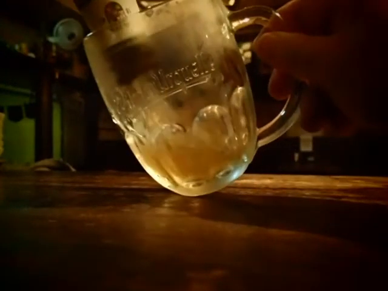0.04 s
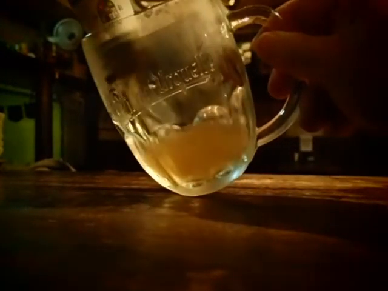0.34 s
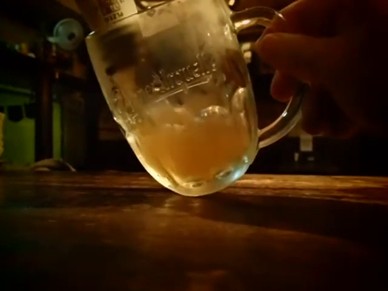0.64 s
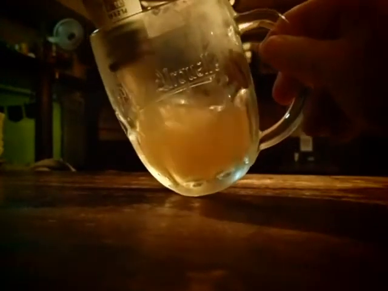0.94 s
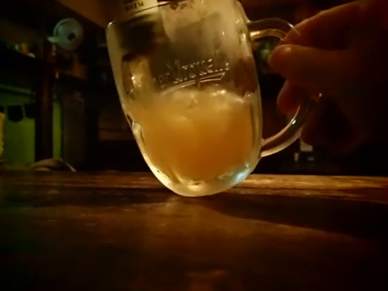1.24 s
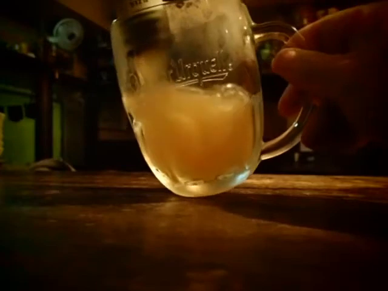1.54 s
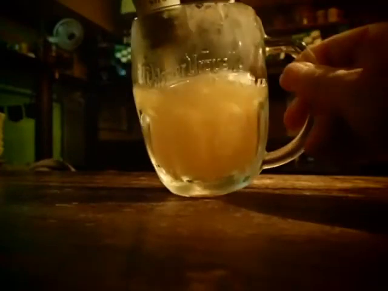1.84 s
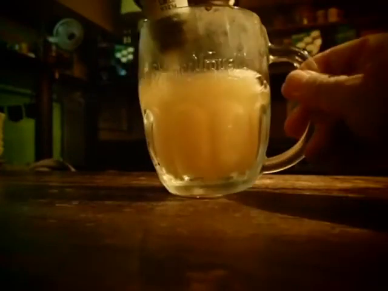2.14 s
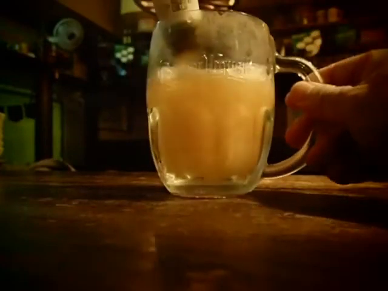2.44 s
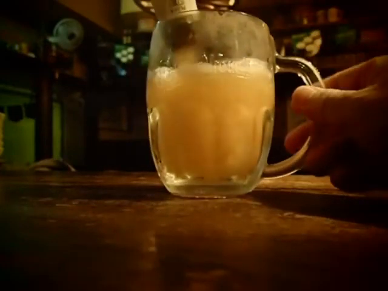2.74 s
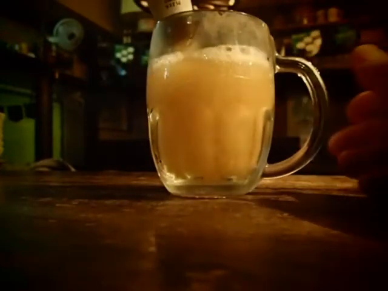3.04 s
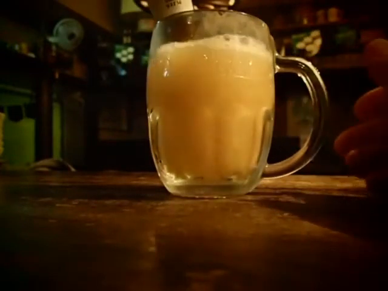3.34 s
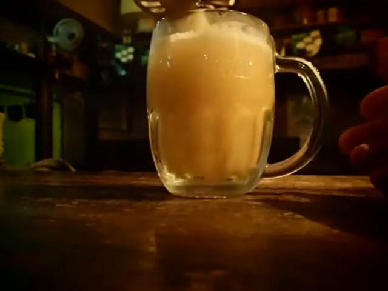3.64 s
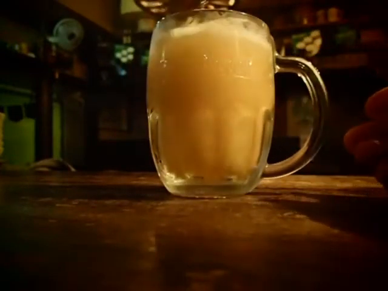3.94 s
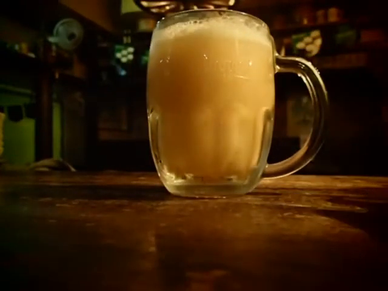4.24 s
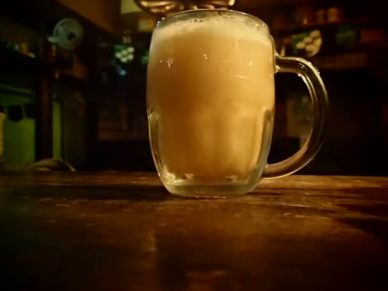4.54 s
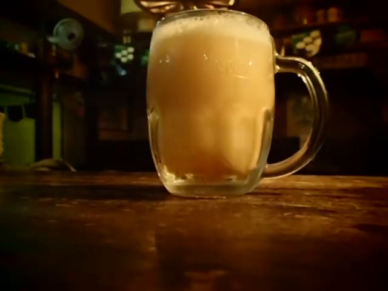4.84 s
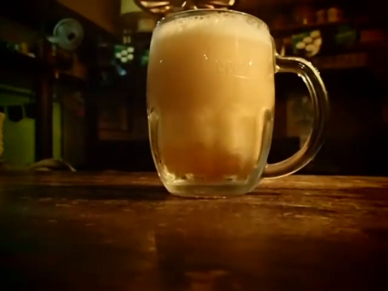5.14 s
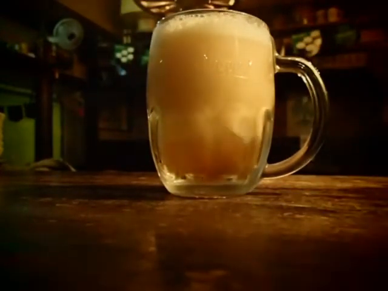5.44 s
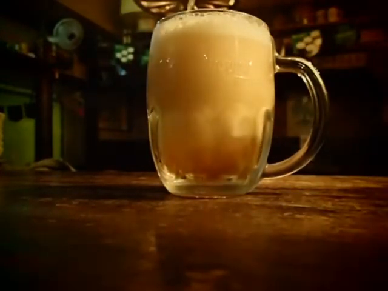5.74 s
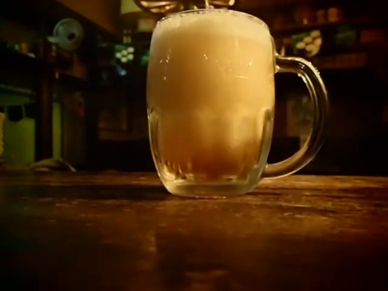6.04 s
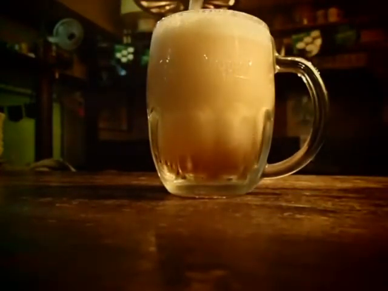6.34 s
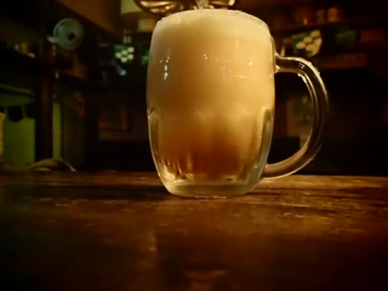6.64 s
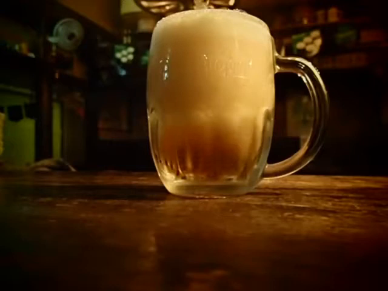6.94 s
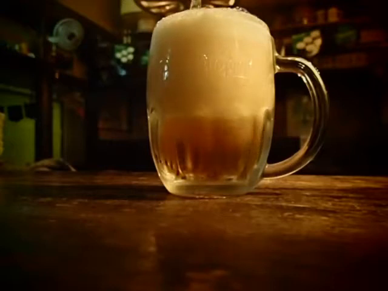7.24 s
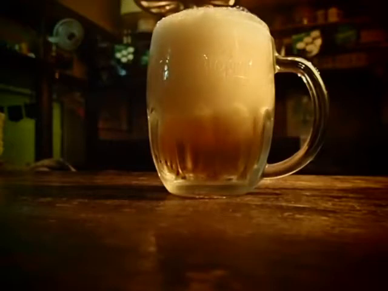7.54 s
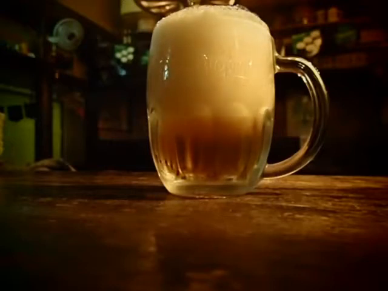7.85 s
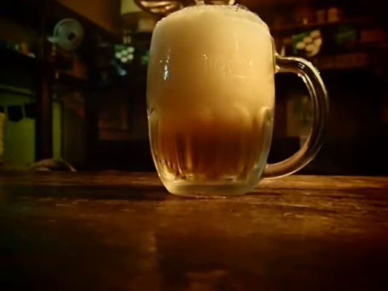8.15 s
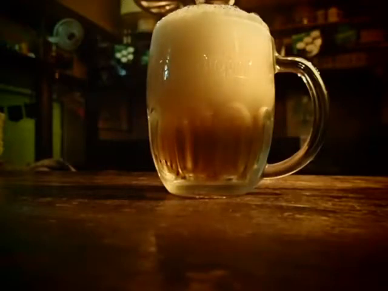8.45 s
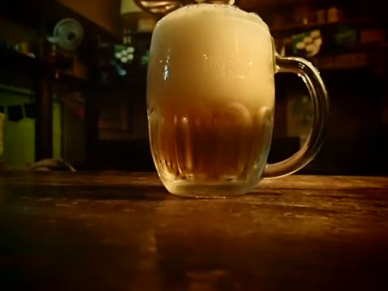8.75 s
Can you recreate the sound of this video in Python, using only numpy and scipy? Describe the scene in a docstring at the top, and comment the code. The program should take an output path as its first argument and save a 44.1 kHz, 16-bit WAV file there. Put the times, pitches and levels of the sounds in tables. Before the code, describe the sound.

Close, bubbly pouring into a glass mug tapers off, followed by a few sharp clinks and faint fizzing, with a cooler humming behind.

```python
"""A wooden bar in a quiet room, where beer is poured from a bottle into a tilted glass mug, heard up close.
Air gulps into the bottle and kicks the neck's resonances; the stream drags bubbles under, where they
ring, and others burst at the surface. The neck clinks on the rim, the mug bumps the wood, foam spurts
once and fresh foam fizzes in swells over a faint high hiss. A cooler hums throughout. A small
microphone colours it all, and its gain control ducks the loudest peaks."""
import sys
import numpy as np
from scipy import signal
from scipy.fft import rfft, irfft, next_fast_len
from scipy.io import wavfile

SR = 44100
rng = np.random.default_rng(int(sys.argv[2]) if len(sys.argv) > 2 else 0)


def wav_record(signal):
    """Record a signal, one row per channel, as 16-bit PCM in the file named by sys.argv[1]."""
    frames = np.transpose(np.atleast_2d(signal))
    bounded = np.clip(frames, -1, 1)
    # unit amplitude maps onto the largest positive 16-bit level
    quanta = np.round(bounded * 32767).astype(np.int16)
    wavfile.write(sys.argv[1], SR, quanta)


N = 392931

# The bottle neck's damped modes. Each row: pitch in Hz, level in dB, time to fall 60 dB in seconds.
NECK_MODES = [(221, -4, 0.028), (433, 3, 0.0098), (800, 3.5, 0.0091), (976, -4.5, 0.042),
              (1570, -11, 0.0033)]
# The half-empty mug singing. Each row: pitch in Hz, level in dB, time to fall 60 dB in seconds.
SINGING_MODES = [(5440, -39, 0.45), (5360, -39, 0.52), (5670, -34.5, 0.32), (5920, -35, 0.23),
                 (7500, -41, .07)]
# Air gulps. Each row: start in seconds, then relative levels in dB of slap, bubble, burst and spray.
AIR_GULPS = [(.461, -20, -31, -15, -35), (.552, -21.5, -38, -13, -29), (0.836, -21.5, -41, -26, -34.5),
             (0.846, -21, -37, -19, -33), (1.142, -13, -19, -18.5, -33.5), (1.158, -8, -27, -.5, -19.5),
             (1.385, -26, -26.5, -33, -47), (1.463, -14, -23.5, -26.5, -37.5),
             (1.777, -19.5, -22.5, -14.5, -37), (1.952, -26, -26.5, -14.5, -30.5),
             (2.302, -17.5, -25, -29.5, -48)]
def gulps(slap_db, singing_db):
    """Each gulp slaps the neck, sinks a bubble and throws a burst; the hardest sets the mug singing."""
    out = np.zeros((2, N))
    burst_lag_s, hardest_gulp_s = .001288, 1.160
    for s, db, bubble_db, burst_db, spray_db in AIR_GULPS:
        add(out, s, from_db(db + slap_db) * struck(NECK_MODES, scatter_db=1))
        add(out, s, from_db(bubble_db) * glug(hz=1014, length_s=.01))  # the neck makes them all one size
        add(out, s + burst_lag_s, burst(burst_db, spray_db, spread_octaves=.013))
    add(out, hardest_gulp_s, from_db(singing_db) * struck(SINGING_MODES, scatter_db=1))
    return out


# Big bubbles. Each row: start in seconds, relative level in dB, starting pitch in Hz, length in seconds.
LARGE_BUBBLES = [(.004, -22, 990, 0.021), (.005, -25, 2070, .012), (0.069, -27, 595, 0.021),
                 (0.069, -40, 2760, 0.013), (.717, -22, 913, 0.011), (.765, -18, 660, .011),
                 (0.78, -15, 566, 0.013), (0.946, -26, 670, .021), (.956, -19.5, 850, 0.019),
                 (1.1, -29, 800, .026), (1.201, -20, 750, 0.031), (1.2394, -17.5, 866, 0.014),
                 (1.585, -26, 1194, .011), (1.664, -37, 2810, .009), (1.801, -27.5, 825, .013),
                 (2.734, -37.5, 2130, .013), (4.72, -39, 2000, 0.018)]
def glugs(level_db):
    """The stream drags large bubbles under, and they ring below the surface."""
    out = np.zeros(N)
    for s, db, hz, length_s in LARGE_BUBBLES:
        add(out, s, from_db(db + level_db) * glug(hz, length_s))
    return out


def glug(hz, length_s, rise_octaves_per_s=19.2, attack_share=.13, wobble=.081, rough=.51):
    """A large bubble swells and dies, shaken by the stream; its pitch climbs as it nears the surface."""
    age = np.linspace(0, 1, int(length_s * SR))
    bend, shake = (np.interp(age, np.linspace(0, 1, 10), knots) for knots in rng.standard_normal((2, 10)))
    pitch = hz * 2 ** (rise_octaves_per_s * length_s * age) * (1 + wobble * bend)
    swell = np.minimum(age / attack_share, 1) * np.cos(np.pi / 2 * age) * (1 + rough * shake)
    return swell * np.sin(2 * np.pi * np.cumsum(pitch) / SR)


# The foreground pops. Each row: start in seconds, then relative levels in dB of burst and spray.
SURFACE_POPS = [(.0034, -11, -40), (.0747, -30, -40), (.1008, -34, -37), (.1345, -14.5, -40),
                (0.4751, -11.5, -48), (0.8556, -15.5, -37), (.8809, -22, -35), (0.8952, -16, -41),
                (0.9022, -9, -33), (1.135, -24, -35), (1.233, -15.5, -32), (1.243, -15, -39),
                (1.536, -23, -39), (1.5442, -16.5, -39), (1.865, -18.5, -41), (1.901, -24, -45),
                (1.974, -28, -44), (2.059, -32, -43), (2.2172, -30.5, -47), (2.533, -26, -55),
                (2.815, -25, -33.5), (3.7788, -25, -41), (3.8364, -29, -38), (4.0482, -11.5, -31),
                (4.296, -26, -43), (4.847, -11.5, -51), (5.464, -30, -46)]
def pops():
    """Clusters of small bubbles burst at the surface."""
    out = np.zeros((2, N))
    for s, db, spray_db in SURFACE_POPS:
        add(out, s, burst(db, spray_db, spread_octaves=.052))
    return out


def burst(db, spray_db, spread_octaves, ring_db=-9.0, snap_db=-1.0, snap_s=.0045, width=.35):
    """A bubble's film tears with a snap, the opened cavities ring and finer spray follows; stereo."""
    detune = 2 ** (spread_octaves * rng.standard_normal())
    ring = cluster(hz=5396 * detune, octaves=.17, cycles=4.95, scatter_s=.0045, count=3)
    spray = cluster(hz=7980 * detune, octaves=.51, cycles=6.8, scatter_s=.007, count=7)
    splash = cluster(hz=3300, octaves=.93, cycles=3.1, scatter_s=.012, count=5)
    t = np.arange(len(ring)) / SR
    snap, side = from_db(spray_db + snap_db) * rng.standard_normal((2, len(t))) * np.exp(-t / snap_s)
    mid = snap + from_db(db + ring_db) * ring + from_db(spray_db) * (spray + .67 * splash)
    return lowpass(mid + width * side * [[1], [-1]], hz=12000, order=1)


def cluster(hz, octaves, cycles, scatter_s, count):
    """Bubbles of mixed sizes go off one after another; peak 1."""
    out = np.zeros(SR // 25)
    for k, (size, late, strength) in enumerate(rng.random((count, 3))):
        start = min(int((k + late) / count * scatter_s * SR), len(out) - 1) if k else 0
        ring = bubble(hz * 2 ** (octaves * (size - .5)), cycles, rise=.015)
        out[start:] += (.5 + strength) * (1 - .5 * k / count) * ring[:len(out) - start]
    return out / np.abs(out).max()


def bubble(hz, cycles, rise):
    """A small bubble chirps upward, fading to 1/e in about the given number of cycles."""
    turns = hz * np.arange(SR // 25) / SR
    return np.sin(2 * np.pi * turns * (1 + rise * turns / cycles)) * np.exp(-turns / cycles)


# The stream plunging into the mug. Each row: time in seconds, bubbles per second (none below zero).
STREAM_RATE = [(0, 130), (.5, 90), (1.2, 180), (2.0, 170), (2.5, 81), (3.2, 15), (3.5, -2)]
def trickle(level_db, size_db, tilt_db_per_octave, cycles):
    """The stream drags in faint, short-lived bubbles; the smaller, the higher and weaker."""
    out = np.zeros(N)
    starts = random_times(STREAM_RATE)
    for s, (smallness, strength) in zip(starts, rng.random((len(starts), 2))):
        octave = 3.8 * np.sqrt(smallness)
        db = level_db + tilt_db_per_octave * octave + size_db * strength ** 2
        add(out, s, from_db(db) * bubble(650 * 2 ** octave, cycles, rise=.018))
    return out


def stray_pops(burst_db, spray_db, scatter_db):
    """A few bubbles burst faintly, at random, while the stream runs."""
    out = np.zeros((2, N))
    for s in random_times(STREAM_RATE, share=.09):
        size_db = scatter_db * min(rng.standard_normal(), 2)
        add(out, s, burst(burst_db + size_db, spray_db + size_db, spread_octaves=.15))
    return out


# The full mug, damped by its beer. Each row: pitch in Hz, level in dB, time to fall 60 dB in seconds.
MUG_MODES = [(1005, -18, 0.055), (2200, -31, 0.067), (2780, -14.5, 0.018), (3100, -16, 0.015),
             (2940, -55, 0.75), (3620, -23.5, 0.02), (4700, -22, 0.014), (5120, -17.5, 0.034),
             (5310, -26, 0.054), (5680, -23.5, 0.025), (6170, -13.5, 0.003), (7370, -18.5, 0.042),
             (8860, -41, 0.064), (9900, -34, 0.027), (13100, -40, .03), (12800, -34, .03)]
# The wooden bar top. Each row: pitch in Hz, level in dB, time to fall 60 dB in seconds.
BAR_MODES = [(169, -15, 0.15), (249, -7, 0.095), (302, -9, 0.1), (490, -7.5, 0.053), (660, -11, 0.031),
             (974, -5.5, 0.021), (1264, -4.5, 0.015), (1583, -9, 0.04), (2250, 3.5, 0.0032)]
# Bottle on rim. Each row: start in seconds, relative glass level in dB, low-pass cutoff in Hz,
# relative thud level in dB, rebound in dB against the first blow.
RIM_HITS = [(3.378, 2.5, 12900, -25, -10), (3.4586, 1.5, 12900, -21, -28), (3.5132, -4.5, 13200, -14, -7),
            (3.7273, 0, 6050, -13.5, -6)]
def clinks(glass_db, thud_db, crack_db, rebound_s=.0128, crack_t60_s=.012):
    """The neck hits the rim with a crack and a ring, thuds through to the wood and falls back once."""
    out = np.zeros(N)
    for s, db, contact_hz, wood_db, rebound_db in RIM_HITS:
        for at, loss_db in ((s, 0), (s + rebound_s, rebound_db)):
            ring = struck(MUG_MODES, scatter_db=.5)
            wood = struck(BAR_MODES, scatter_db=1)
            t = np.arange(len(ring)) / SR
            crack = from_db(crack_db - 60 * t / crack_t60_s) * rng.standard_normal(len(t))
            glass = lowpass(ring + lowpass(crack, hz=7700), contact_hz, order=8)
            add(out, at, from_db(db + loss_db + glass_db) * glass)
            add(out, at, from_db(wood_db + loss_db + thud_db) * wood)
    return out


# The bottle's glass. Each row: pitch in Hz, level in dB, time to fall 60 dB in seconds.
BOTTLE_MODES = [(3110, -31, 0.084), (3220, -36, 0.15), (4400, -36, 0.013), (5260, -39.5, 0.11),
                (5580, -36.5, 0.12), (5800, -47, .2)]
def bottle_tap(start_s):
    """A last light tap sets the bottle itself ringing."""
    out = np.zeros(N)
    add(out, start_s, struck(BOTTLE_MODES, scatter_db=.5))
    return out


# The mug's heel rocking as it is set upright. Each row: start in seconds, relative level in dB.
HEEL_BUMPS = [(1.465, -25), (1.498, -17), (2.304, -13), (2.315, -25)]
def knocks(level_db):
    """The heavy base bumps softly on the wood, so only the bar's low modes answer."""
    out = np.zeros(N)
    for s, db in HEEL_BUMPS:
        add(out, s, from_db(db + level_db) * lowpass(struck(BAR_MODES, scatter_db=4), hz=260))
    return out


# The spurt's bright hiss. Each row: frequency in Hz, relative level in dB.
SPURT_EQ = [(1200, 4.5), (2500, 4), (4000, 1), (5200, 15.5), (6200, -5), (7200, 13.5), (8000, 14.5),
            (10000, -12), (12000, 3), (15000, -20)]
def spurt(start_s, crest_db, attack_s=.018, rise_db_per_s=330, fall_db_per_s=290):
    """A plug of foam breaks out of the neck all at once, grows briefly and dies away."""
    age = np.arange(N) / SR - start_s
    past_crest = age - attack_s
    db = crest_db + np.minimum(rise_db_per_s * past_crest, -fall_db_per_s * past_crest)
    return (age > 0) * from_db(db) * stereo_bed(crackle(per_s=8600, size_db=1.5), SPURT_EQ)


# The tone of the steady high hiss. Each row: frequency in Hz, relative level in dB.
HISS_EQ = [(1000, -9), (2300, 2), (4000, -2.5), (5400, 3.5), (6200, 4.5), (7000, -3), (8200, -1.5),
           (10000, -4.5), (15000, -8)]
# The tone of fresh foam. Each row: frequency in Hz, relative level in dB.
FRESH_FOAM_EQ = [(1000, -8), (2300, 1.5), (4000, -3), (5300, 5.5), (6200, 2.5), (7000, 0.5), (8400, 1),
                 (10000, -6), (15000, -8.5)]
# Fresh foam running onto the head. Each row: crest time in seconds, level in dB, half width in seconds.
FOAM_SWELLS = [(2.96, -47.5, 0.21), (3.85, -52, 0.074), (4.48, -48.5, 0.45), (5.47, -44, .025),
               (5.49, -44.5, .135)]
def foam_and_hiss(hiss_db, flutter_db, roundness):
    """Fresh foam fizzes in swells over a steady, faint high hiss, microphone noise or fine fizz."""
    t = np.arange(N) / SR
    hiss = from_db(hiss_db) * stereo_bed(crackle(per_s=14000, size_db=2.5), HISS_EQ)
    swell = sum(from_db(db) * np.exp(-np.abs((t - s) / width) ** roundness)
                for s, db, width in FOAM_SWELLS)
    fresh = stereo_bed(crackle(per_s=7000, size_db=1.0), FRESH_FOAM_EQ)
    return from_db(flutter_db * drift(per_s=31)) * (hiss + swell * fresh)


def crackle(per_s, size_db):
    """Two streams of tiny random clicks of uneven size."""
    born = rng.random((2, N)) < per_s / SR
    clicks = born * rng.standard_normal((2, N))
    return clicks * from_db(size_db * np.minimum(rng.exponential(1, (2, N)), 4))


# Room air and the cooler's fan. Each row: frequency in Hz, relative level in dB.
FAN_EQ = [(20, -22), (45, -11.5), (110, -7), (150, -4.5), (230, 0), (330, -6), (550, -12), (900, -13.5),
          (1050, -17.5), (1300, -18), (1700, -25.5), (2600, -32.5), (5000, -48), (15000, -44)]
# The cooler's motor tones. Each row: pitch in Hz, relative level in dB.
MOTOR_TONES = [(96, -45), (190, -43), (232, -43), (241, -40), (296, -41), (346, -51.5), (490, -52.5),
               (647, -48), (705, -48.5), (752, -50), (799, -57.5), (934, -49), (966, -52.5)]
def cooler(air_db, hum_db, waver_db, wander_rad):
    """The fan rushes softly under motor tones that waver in level and phase."""
    t = np.arange(N) / SR
    hum = np.zeros(N)
    for hz, db in MOTOR_TONES:
        amplitude = np.sqrt(2) * from_db(db + waver_db * drift(per_s=16))
        hum += amplitude * np.sin(2 * np.pi * hz * t + wander_rad * drift(per_s=15))
    air = stereo_bed(rng.standard_normal((2, N)), FAN_EQ)
    return from_db(air_db) * air + from_db(hum_db) * hum


def room(x, wet_db, wall_hz, width, t60_s=.26, predelay_s=.003):
    """The walls return a short, diffuse tail, a little different on each side."""
    t = np.arange(SR // 2) / SR
    mid, side = rng.standard_normal((2, len(t))) * from_db(-60 * t / t60_s) * (t > predelay_s)
    tail = lowpass(mid + width * side * [[1], [-1]], wall_hz)
    tail /= np.sqrt(np.sum(tail ** 2) / 2)
    return from_db(wet_db) * signal.fftconvolve(x[None], tail, axes=1)[:, :N]


# The stereo image of fan, foam and hiss. Each row: frequency in Hz, left-right coherence (1 is mono).
STEREO_COHERENCE = [(30, 0.71), (150, .99), (1000, 0.93), (3000, 1), (6000, 0.68), (9000, 0.083),
                    (15000, 0.1)]
def stereo_bed(pair, eq):
    """Two unrelated signals become one equalised stereo texture, widest in the treble; rms 1."""
    size = next_fast_len(N)
    hz = np.fft.rfftfreq(size, 1 / SR)
    mid, side = rfft(pair, size) * from_db(at_hz(eq, hz))
    alike = np.clip(at_hz(STEREO_COHERENCE, hz), 0, 1)
    spectrum = np.sqrt(1 + alike) * mid + np.sqrt(1 - alike) * side * [[1], [-1]]
    bed = irfft(spectrum, size)[:, :N]
    return bed / np.sqrt(np.mean(bed ** 2) + 1e-20)


def struck(modes, scatter_db):
    """One blow: the modes ring down in alternating polarity, each at a slightly random strength."""
    t = np.arange(SR // 2) / SR
    out = np.zeros(len(t))
    for k, (hz, db, t60) in enumerate(modes):
        decay = from_db(db + scatter_db * rng.standard_normal() - 60 * t / t60)
        out += (-1) ** k * decay * np.sin(2 * np.pi * hz * t)
    return out


def random_times(rate_curve, share=1):
    """Random triggers, in seconds, at a share of a changing rate."""
    per_s = np.interp(np.arange(N) / SR, *np.transpose(rate_curve))
    return np.flatnonzero(rng.random(N) < share * per_s / SR) / SR


def drift(per_s):
    """A modulator that glides between random values."""
    return np.interp(np.arange(N) / SR * per_s, np.arange(2000), rng.standard_normal(2000))


def from_db(db):
    """Decibels to gain."""
    return 10 ** (np.asarray(db) / 20)


def at_hz(points, hz):
    """Read a curve on a log-frequency axis."""
    known_hz, values = np.transpose(points)
    return np.interp(np.log(hz + 1e-3), np.log(known_hz), values)


def add(track, s, sound):
    """Mix a short sound in at s seconds."""
    start = max(round(s * SR), 0)
    track[..., start:start + sound.shape[-1]] += sound[..., :N - start]


def lowpass(x, hz, order=2):
    """Roll off the treble."""
    return signal.sosfilt(signal.butter(order, min(hz, .45 * SR), fs=SR, output="sos"), x)


def scene():
    """Pour and glass sit in the centre with a little reverb; foam, hiss and cooler spread around them."""
    background = cooler(air_db=-34.5, hum_db=-2.0, waver_db=2.0, wander_rad=.86)
    sizzle = foam_and_hiss(hiss_db=-56.5, flutter_db=2.0, roundness=1.3)
    sizzle += spurt(start_s=4.029, crest_db=-27.5)
    contacts = clinks(glass_db=-.5, thud_db=1.5, crack_db=-15.0)
    contacts += bottle_tap(start_s=4.847) + knocks(level_db=-2.0)
    pour = glugs(level_db=-.5) + gulps(slap_db=-2.0, singing_db=-3.5) + pops()
    stream = trickle(level_db=-44.5, size_db=11, tilt_db_per_octave=-2.5, cycles=4.7)
    strays = stray_pops(burst_db=-32, spray_db=-54.5, scatter_db=3.0)
    near = pour + stream + strays + contacts
    return near + room(near.mean(axis=0), wet_db=-16.0, wall_hz=9350, width=.21) + sizzle + background


# The microphone port's peaks and notches. Each row: nominal centre in Hz, Q, boost or cut in dB.
PORT_EQ = [(1885, 21, -14), (2615, 5.1, -8), (2950, 8.6, 2.5), (3416, 11.4, -7), (4030, 7.4, -10.5),
           (4850, 40, -11.5), (5520, 2.01, 13), (7870, 4.1, 6.5)]
def microphone(x, tuning):
    """The cavity of a small port colours the sound like a chain of bell filters."""
    for hz, q, db in PORT_EQ:
        w, gain = 2 * np.pi * hz * tuning / SR, from_db(db / 2)
        half_band = np.sin(w) / (2 * q)
        x = signal.lfilter([1 + half_band * gain, -2 * np.cos(w), 1 - half_band * gain],
                           [1 + half_band / gain, -2 * np.cos(w), 1 - half_band / gain], x)
    return x


def gain_control(x, threshold_db, release_db_per_s, attack_s):
    """Loud peaks pull the gain down quickly; it creeps back."""
    over_db = np.maximum(20 * np.log10(np.abs(x).max(axis=0) + 1e-9) - threshold_db, 0)
    ramp = release_db_per_s * np.arange(N) / SR
    held_db = np.maximum.accumulate(over_db + ramp) - ramp
    pole = np.exp(-1 / (attack_s * SR))
    return x * from_db(-signal.lfilter([1 - pole], [1, -pole], held_db))


def record(dry):
    """Two slightly detuned microphone ports feed gain control, soft clipping and a steep high cut."""
    mismatch, cutoff_hz = .013, 15900
    ports = np.array([microphone(dry[0], 1 + mismatch), microphone(dry[1], 1 - mismatch)])
    ducked = gain_control(ports, threshold_db=-7.5, release_db_per_s=62, attack_s=.002)
    high_cut = signal.ellip(12, .1, 70, cutoff_hz, fs=SR, output="sos")
    return signal.sosfilt(high_cut, np.tanh(ducked))


dry = scene()
out = record(dry)
wav_record(out)
```